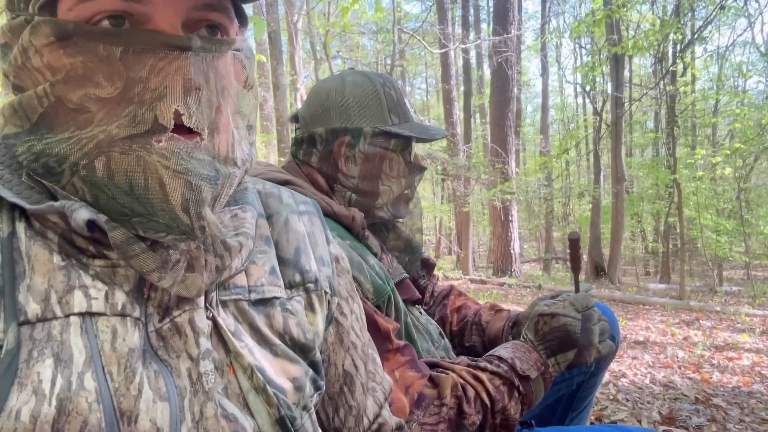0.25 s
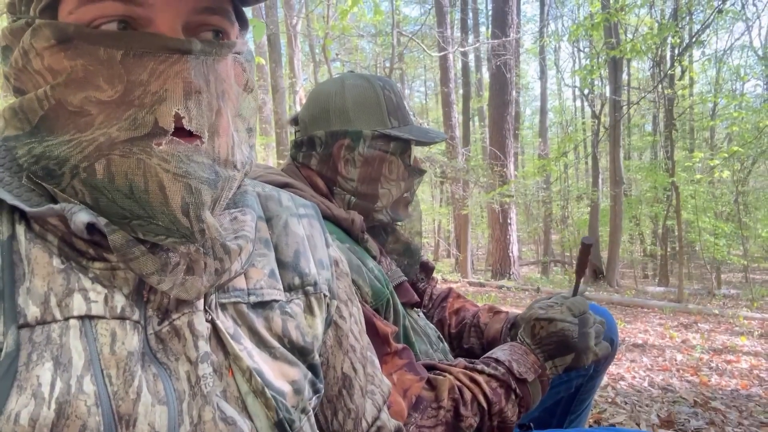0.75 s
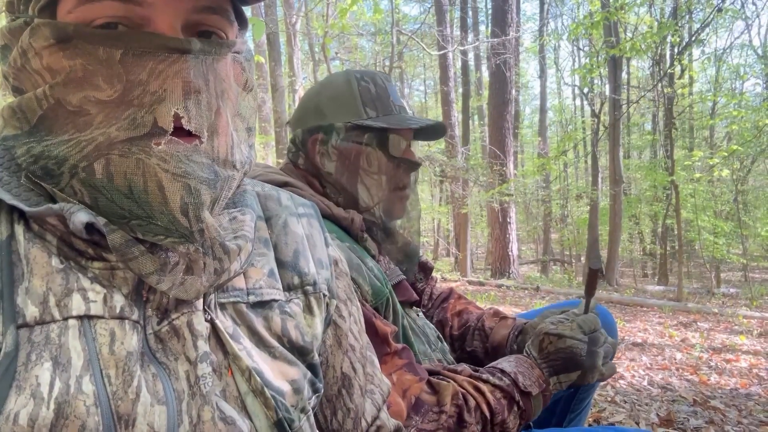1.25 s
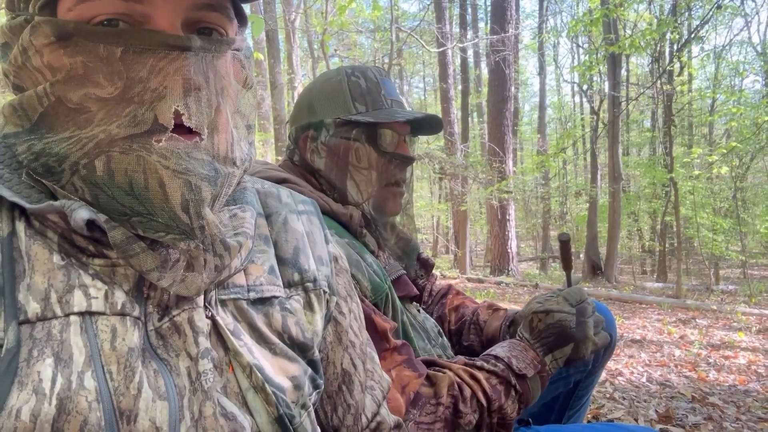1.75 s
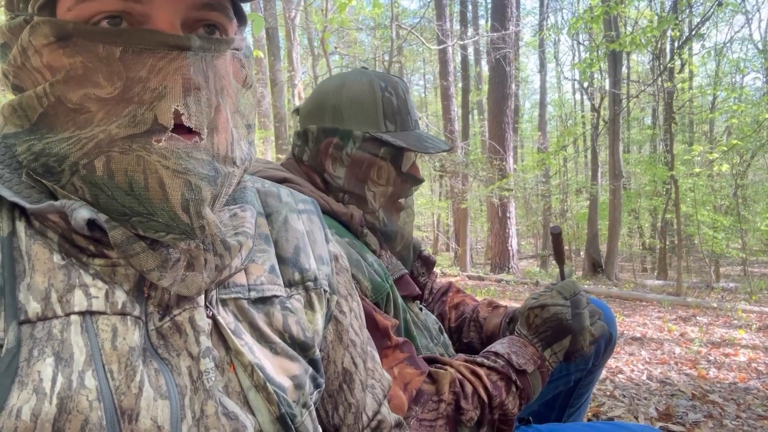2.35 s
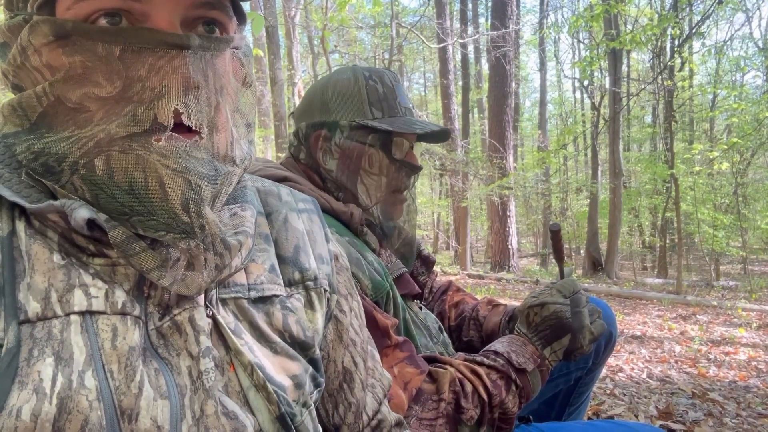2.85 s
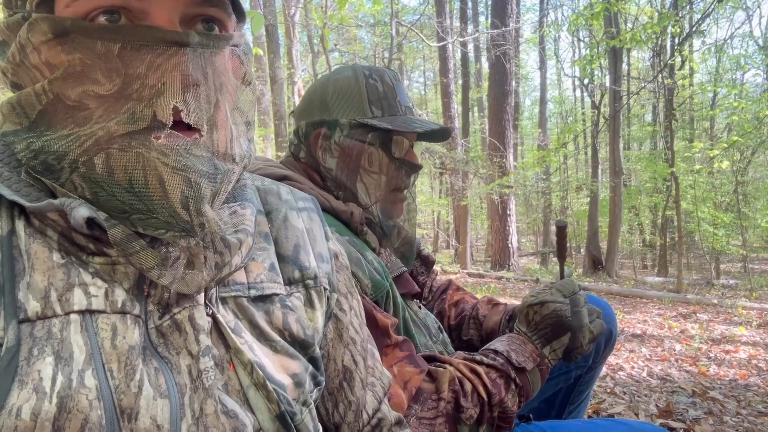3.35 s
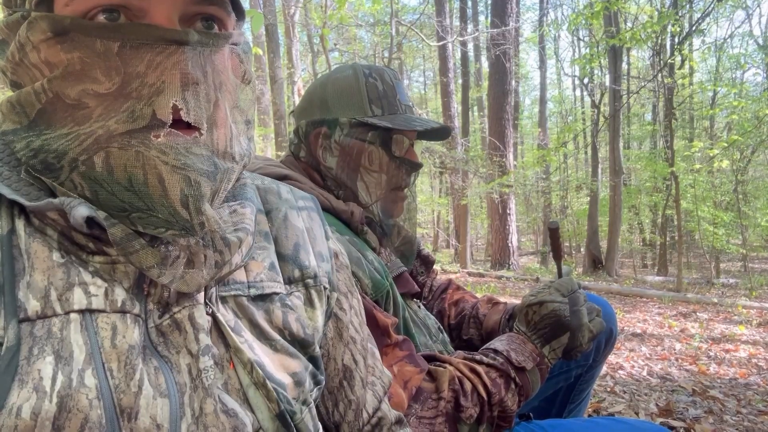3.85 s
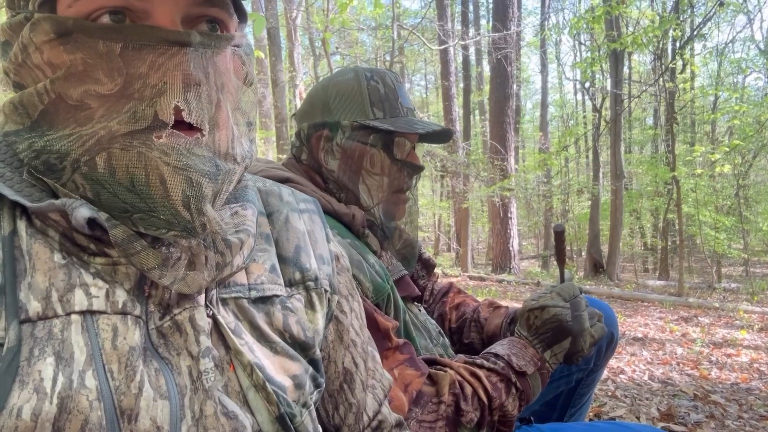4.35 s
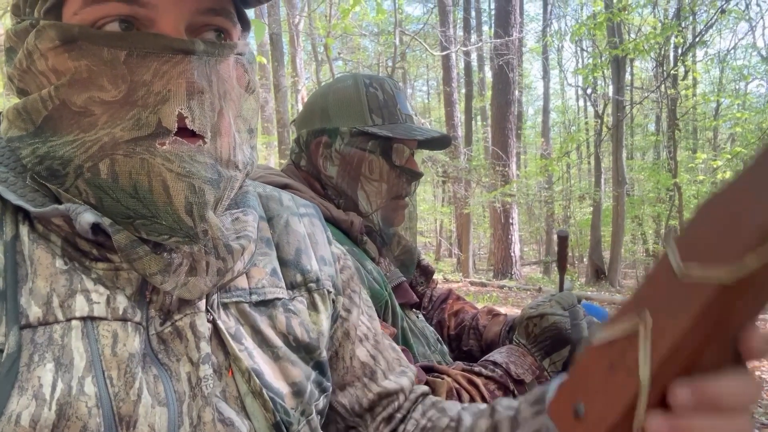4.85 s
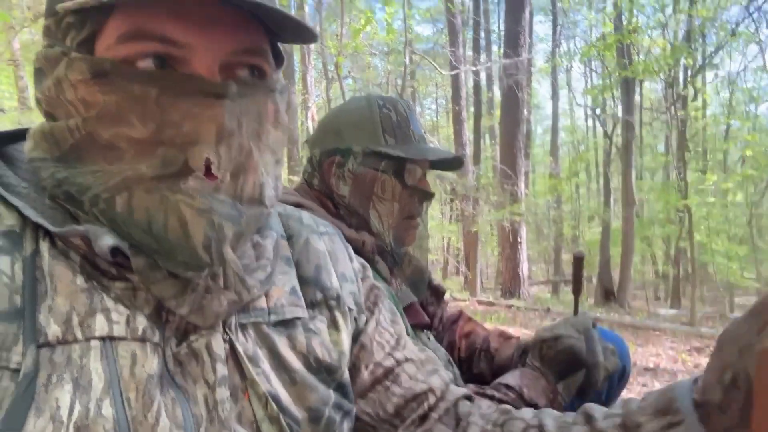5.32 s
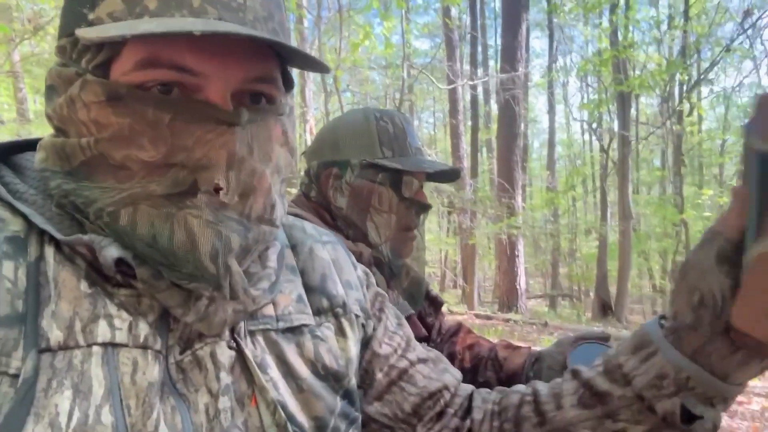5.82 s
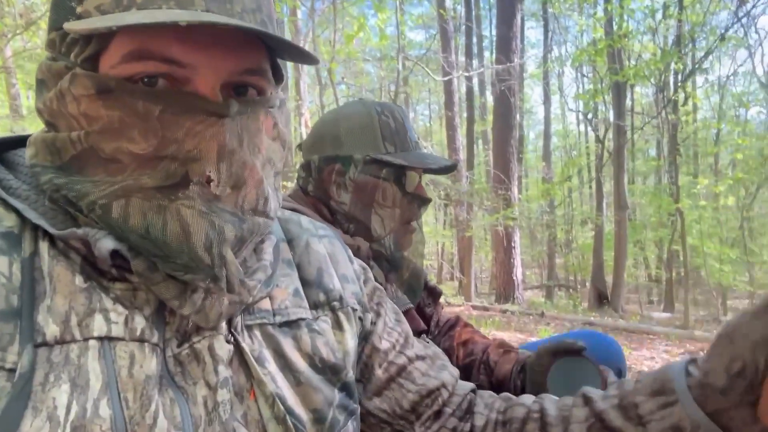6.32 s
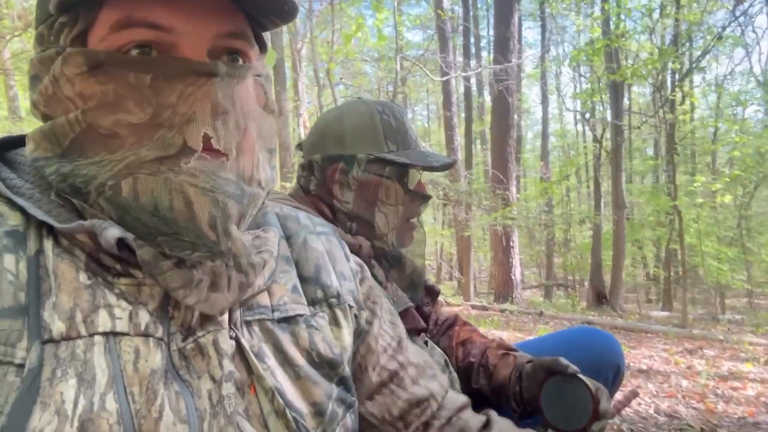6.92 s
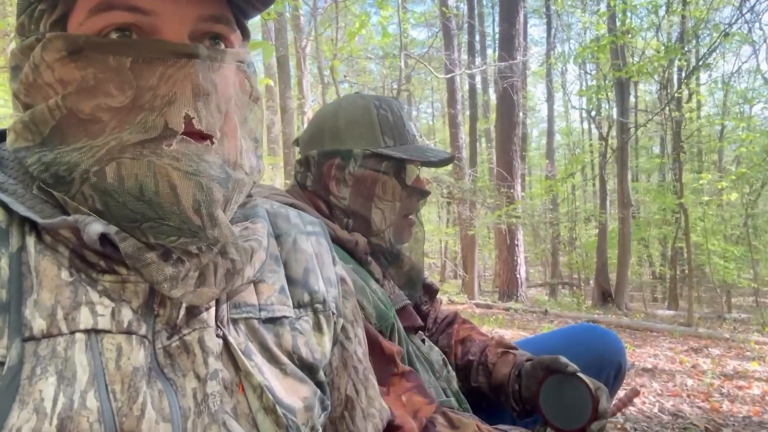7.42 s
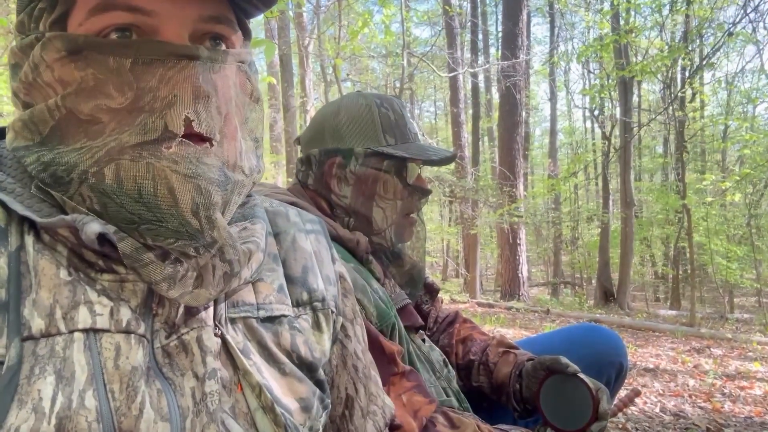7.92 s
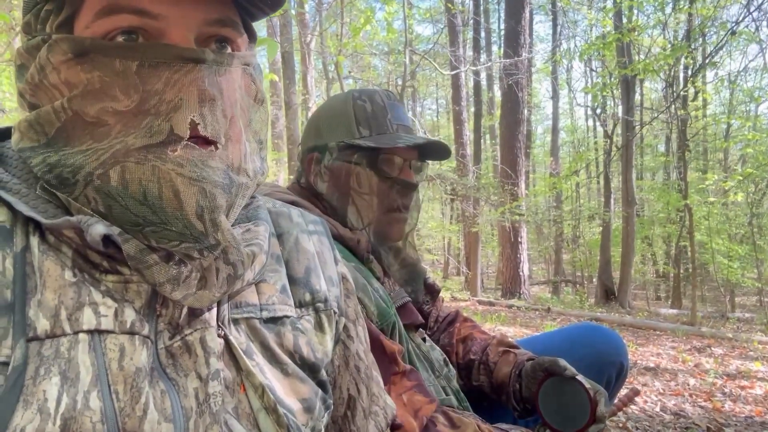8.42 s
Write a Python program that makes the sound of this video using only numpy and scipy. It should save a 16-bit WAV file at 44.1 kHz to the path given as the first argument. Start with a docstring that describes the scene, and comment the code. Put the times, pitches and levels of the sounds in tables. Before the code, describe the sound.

Quiet spring woods, heard close up with low wind rumble, very faint leaf hiss and a thin high whine coming and going until about 2.2 s. A friction pot call gives a sharp, woody cluck at 0.23 s, a much softer one at 1.33 and a barely audible one at 2.42, with small handling ticks between. From 2.57 to 4.7 come eight short yelps about 0.3 s apart, the first smoother, the others raspy then breaking into a clean rising note. Clothing thuds bump around 4.6-4.8. From 4.74 a box call is shaken: loud falling squeals, knocks and rasping wooden drags about nine times a second, with a slight tree echo, weakening after 5.95 into two low scraping slides by 6.4. A clear tap at 6.48, then scattered soft taps, strongest near 7.8, and faint wavering bird whistles at 7.2-7.7, with tiny chirps later, over wind until 8.7.

```python
"""Three clucks, each softer, and a run of mostly raspy yelps, then a squealing gobble in quiet spring woods.
A striker sticks and slips on a pot call; a box call is then shaken, its lid rubbing to and fro on the rim.
Friction pulses and noise excite each call's body; two microphone ports hear it with an echo from the woods.
Handling ticks, clothing bumps, far birds, a thin whine, leaf hiss and low wind lie underneath."""
import sys
import numpy as np
from scipy import signal
from scipy.fft import rfft, irfft, next_fast_len
from scipy.io import wavfile
from scipy.ndimage import uniform_filter1d, minimum_filter1d, map_coordinates

SR = 44100
rng = np.random.default_rng(int(sys.argv[2]) if len(sys.argv) > 2 else 0)


def wav_record(signal):
    """Record a signal, one row per channel, as 16-bit PCM in the file named by sys.argv[1]."""
    frames = np.transpose(np.atleast_2d(signal))
    bounded = np.clip(frames, -1, 1)
    # unit amplitude maps onto the largest positive 16-bit level
    quanta = np.round(bounded * 32767).astype(np.int16)
    wavfile.write(sys.argv[1], SR, quanta)


N = 382788
TIME = np.arange(N) / SR
NOISE = rng.standard_normal(2 * N)
TOP_HZ = 15900
# box call body response: (frequency [Hz], relative level [dB])
BOX_BODY = [(200, -17), (520, -12.5), (760, 0), (1020, -1), (1350, 5), (1750, 2.5), (2050, 1),
            (2280, -14.5), (2570, -6), (2950, -23.5), (3350, -12.5), (6600, -21.5), (7400, -28.5),
            (11700, -41.5)]


def undb(db):
    """Decibels to amplitude gain."""
    return 10 ** (np.asarray(db) / 20)


def level(x, db):
    """Scale to an rms level in dB."""
    return x * undb(db) / np.sqrt(np.mean(x ** 2))


def add(track, start_s, x):
    """Mix a sound into a track at a time."""
    i = max(int(start_s * SR), 0)
    track[i:i + len(x)] += x[:max(N - i, 0)]


def course(length_s):
    """Progress from 0 to 1 over a note."""
    return np.linspace(0, 1, int(length_s * SR))


def wander(n, rate_hz):
    """Random motion, spread near 1: straight lines between rate_hz random knots a second."""
    knots = np.arange(n) * rate_hz / SR
    return np.interp(knots, np.arange(N), NOISE[rng.integers(N):][:N])


def colour(x, points):
    """Minimum-phase (causal) filter with a (Hz, dB) response, built from its cepstrum."""
    n = 2 * next_fast_len(len(x) // 2 + 1024)
    hz, db = np.transpose(points)
    f = np.maximum(np.fft.rfftfreq(n, 1 / SR), 1)
    cepstrum = irfft(np.log(undb(np.interp(np.log(f), np.log(hz), db))))
    # fold onto positive time
    cepstrum[1:n // 2] *= 2
    cepstrum[n // 2 + 1:] = 0
    response = np.exp(rfft(cepstrum))
    return irfft(rfft(x, n) * response)[:len(x)]


def ring(x, body, db):
    """A short excitation rings out in a body; db is the rms of its energy spread over the excitation."""
    y = colour(np.pad(x, (0, SR // 50)), body)
    return y * undb(db) / np.sqrt(np.sum(y ** 2) / len(x))


def stick_slip(hz, tilt_db):
    """Friction pulses at a moving pitch: 18 harmonics that change by tilt_db an octave."""
    k = np.arange(1, 19)[:, None]
    weight = undb(tilt_db * np.log2(k)) * (k * hz < TOP_HZ)
    phase = 2 * np.pi * np.cumsum(hz) / SR
    return np.sum(weight * np.cos(k * phase), axis=0)


def scrape(n, patchy_db):
    """Chalked wood rubbing in uneven grains: noise of wandering level."""
    return rng.standard_normal(n) * undb(patchy_db * wander(n, 350))


def place(x, ports):
    """Two ports: nearby bodies shade and delay the left one differently at each pitch."""
    f = np.fft.rfftfreq(N, 1 / SR)
    hz, *columns = np.transpose(ports)
    db, lag_ms = (np.interp(np.log(f + 1), np.log(hz), c) for c in columns)
    late = np.exp(-2j * np.pi * f * lag_ms / 1000)
    return irfft(rfft(x) * np.array([late * undb(db / 2), undb(-db / 2)]), N)


def sway(pair):
    """The hand sways, so the sound reaches the left port a little earlier or later."""
    lag_s, rate_hz = .000025, 9
    at = np.arange(N) + lag_s * SR * wander(N, rate_hz)
    return np.array([map_coordinates(pair[0], [at], mode="nearest"), pair[1]])


def wind():
    """Low rumble as wind buffets the ports, partly in common, at first mostly the right one."""
    # rumble spectrum: (frequency [Hz], relative level [dB per Hz])
    rumble = [(13, -50.5), (22, -6), (29, -12), (36, -3), (60, 2.5), (89, -7), (264, -38), (296, -45),
              (342, -45), (456, -59), (500, -48.5), (650, -71.5), (1100, -120)]
    # wind strength: (time [s], level [dB])
    gust = [(0, -46), (2.2, -47.5), (3.8, -45.5), (4.3, -42), (4.5, -44.5), (4.7, -37), (5.4, -38),
            (6.3, -40.5), (7.1, -46.5), (8.68, -42.5)]
    # balance of the ports: (time [s], left minus right [dB])
    pan = [(4.7, -13.5), (6.5, -.3)]
    buffet_db, buffet_hz = 2.5, 7.1
    gust_db = np.interp(TIME, *np.transpose(gust)) + buffet_db * wander(N, buffet_hz)
    pan_db = np.interp(TIME, *np.transpose(pan))
    ports = undb(np.array([pan_db, -pan_db]) / 2)
    common, left, right = (level(colour(rng.standard_normal(N), rumble), 0) for _ in range(3))
    mixed = 0.94 * common + .4 * np.array([left, right])
    return mixed * ports / ports.mean(axis=0) * undb(gust_db)


def leaves():
    """Very faint leaf hiss: independent noise in each port, slowly settling."""
    # hiss spectrum: (frequency [Hz], relative level [dB per Hz])
    hiss = [(180, -20), (400, 1), (1100, -3), (2000, -11), (5000, -14), (11000, -17.5), (15000, -46)]
    # slow swell: (time [s], gain [dB])
    swell = [(4.5, 1), (6.8, -2.5)]
    pair = np.array([level(colour(rng.standard_normal(N), hiss), -79) for _ in range(2)])
    return pair * undb(np.interp(TIME, *np.transpose(swell)) + 0.48 * wander(N, 0.95))


def woods(x, t60_s, wet_db, near_db):
    """Quick scatter off the leaf litter, then a thin long echo from the trees, by noise convolution."""
    t = np.arange(int(1.5 * SR)) / SR
    # echo colours: (frequency [Hz], relative level [dB])
    trunks = [(200, -18.5), (700, -0.5), (1150, 9), (1500, -9), (1800, -2), (2200, -4), (3000, 5),
              (3900, -0.5), (5200, 6), (6300, 6.5), (11000, -11.5)]
    litter = [(500, -0.5), (1500, -9), (3000, 2.5), (6000, 2.5), (10000, -1.5)]
    far_gain = undb(wet_db - 60 * t / t60_s)
    near_gain = undb(near_db) * (np.exp(-t / 0.016) + 4 * np.exp(-t / 0.0032))
    ports = []
    for _ in range(2):
        far = colour(rng.standard_normal(len(t)) * far_gain, trunks)
        near = colour(rng.standard_normal(len(t)) * near_gain, litter)
        ports.append(signal.fftconvolve(x, far + near)[:N])
    return np.array(ports)


def whine():
    """A faint whine comes and goes: two flickering sine lines with a soft high noise chirr."""
    # spells: (time [s], length [s])
    spells = [(0, 0.71), (0.94, 0.34), (1.911, 0.33)]
    # sine lines: (frequency [Hz], level [dB])
    lines = [(1000, -84.5), (5000, -89)]
    # chirr spectrum: (frequency [Hz], relative level [dB per Hz])
    chirr = [(4200, -40.5), (5000, 1), (5400, -5.5), (5900, -2), (6300, -6.5), (7000, -42.5)]
    chirr_db = -89
    out = np.zeros(N)
    for s, length, in spells:
        u = course(length)
        fade = np.abs(np.sin(np.pi * u)) ** .3
        add(out, s, level(colour(rng.standard_normal(len(u)), chirr) * fade, chirr_db))
        for hz, db in lines:
            phase = 2 * np.pi * hz * length * u + 1.1 * wander(len(u), 60)
            line = np.sin(phase) * undb(4 * wander(len(u), 30))
            add(out, s, level(line * fade, db))
    return out


def birds():
    """Thin wavering whistles from deep in the trees, each with an exponential echo tail."""
    # notes: (time [s], length [s], mean pitch [Hz])
    notes = [(7.171, 0.097, 4220), (7.32, 0.062, 3800), (7.43, .08, 4030), (7.51, 0.086, 4530),
             (7.583, 0.083, 5460), (7.674, .07, 4600), (8.0, .02, 4980), (8.317, .025, 5050),
             (8.63, 0.026, 5070)]
    bird_db, echo_share, warble = -88, 1.2, .01
    out, t = np.zeros(N), np.arange(SR // 2) / SR
    for s, length, hz in notes:
        # many paths through the wood blur each note into a narrow band
        blur = wander(len(t), 160) + 1j * wander(len(t), 160)
        pitch = hz * (1 + warble * wander(len(t), 50))
        tone = np.exp(2j * np.pi * np.cumsum(pitch) / SR)
        whistle = level(np.real(blur * tone), bird_db)
        attack = np.minimum(2 * t / length, 1)
        echo = np.exp(-np.maximum(t - length, 0) / (echo_share * length))
        add(out, s, whistle * attack * echo)
    return out


def bumps():
    """Clothing against the microphone: low damped thuds that sink in pitch as they die."""
    # thuds: (time [s], relative level [dB])
    thuds = [(0.624, -34.5), (3.524, -30.5), (4.108, -35), (4.594, -28), (4.664, -25.5), (4.76, -25),
             (5.398, -30), (6.405, -36), (7.517, -46)]
    out, t = np.zeros(N), np.arange(SR // 5) / SR
    hz = 62 + 85 * np.exp(-t / 0.01)
    thud = np.sin(2 * np.pi * np.cumsum(hz) / SR) * (1 - np.exp(-t / 0.0037)) * np.exp(-t / 0.025)
    for s, db in thuds:
        add(out, s, undb(db + 5) * thud)
    return out


def ticks():
    """Soft taps as the calls are handled: coloured noise bursts that decay in milliseconds."""
    # taps: (time [s], peak level [dB])
    taps = [(0.435, -45.5), (0.463, -46.5), (0.616, -47), (1.27, -44), (1.285, -49), (1.432, -42.5),
            (1.45, -47), (6.481, -30.5), (6.755, -62), (7.037, -60), (6.886, -50), (7.152, -53.5),
            (7.267, -49), (7.395, -42), (7.563, -55.5), (7.692, -49.5), (7.802, -36), (7.961, -47.5),
            (8.097, -46.5), (8.206, -61)]
    # tap colour: (frequency [Hz], relative level [dB])
    tap_body = [(150, -14), (450, -1), (750, 1), (1080, 5.5), (1450, -9.5), (1900, -5), (2600, -20),
                (5500, -27.5), (10000, -52)]
    out, t = np.zeros(N), np.arange(1024) / SR
    for s, db in taps:
        tap = colour(rng.standard_normal(len(t)) * np.exp(-t / 0.0026), tap_body)
        add(out, s, tap * undb(db) / np.abs(tap).max())
    return out


def pot_call():
    """The striker chatters early in a yelp, breaks, then settles to a clean rising note; clucks are pops."""
    # yelps: (time [s], length [s], nominal pitch [Hz], level [dB], raspy until [share], rasp depth [0-1])
    yelps = [(2.57, 0.12, 706.5, -19, 0.35, 0.074), (2.896, 0.07, 728, -18, 0.36, 0.84),
             (3.187, 0.069, 732.7, -17, 0.48, 1), (3.487, 0.063, 736.6, -15.5, 0.26, 0.97),
             (3.779, 0.06, 740, -16.5, 0.38, 1), (4.079, 0.057, 722, -14.5, .4, 0.93),
             (4.36, 0.06, 715.6, -17, 0.39, 1), (4.625, 0.056, 717, -17, 0.45, 1)]
    # course of one yelp, breaking midway: (progress [0-1], pitch [ratio], relative level [dB])
    stroke = [(0, 1.02, -21.5), (0.11, .99, 2), (0.3, .98, -0.5), (.42, 1.02, 1.5), (0.501, .9, -11.5),
              (0.589, .99, 4), (.72, 1.04, 1.5), (.86, 1.1, -4), (.95, 1.28, -12), (1, 0.94, -42.5)]
    # clucks: (time [s], length [s], start pitch [Hz], end pitch [Hz], level [dB])
    clucks = [(0.227, 0.028, 866, 662, -14.5), (1.328, 0.0088, 782, 645, -29.5),
              (2.422, 0.011, 750, 670, -49.5)]
    # pot body response: (frequency [Hz], relative level [dB])
    pot_body = [(300, -44), (520, -29), (680, -48), (950, -24.5), (1250, 4.5), (1480, 1), (1800, -10),
                (2100, -1.5), (2600, -14.5), (3150, -44.5), (3550, -32), (3950, -22), (4700, -34.5),
                (6100, -29.5), (15000, -74.5)]
    out = np.zeros(N)
    progress, ratio, stroke_db = np.transpose(stroke)
    for s, length, hz, db, until, depth in yelps:
        u = np.interp(course(length), [0, until, 1], [0, .5, 1])
        rasp = depth * np.interp(u, [.12, .24, .5, .58], [0, 1, 1, 0])
        # a gentle stroke hardly breaks
        mend = (1 - depth) * np.interp(u, [.25, .42, .5, .59], [0, 1, 1, 0])
        jitter = (.012 + .085 * rasp) * wander(len(u), 1100)
        pitch = hz * (np.interp(u, progress, ratio) * (1 - mend) + .96 * mend) * (1 + jitter)
        force_db = np.interp(u, progress, stroke_db) * (1 - mend)
        # in the rasp every third slip is stronger and the grip flutters
        third = np.cos(2 * np.pi * np.cumsum(pitch) / SR / 3)
        flutter = np.tanh(2 * wander(len(u), 350))
        chatter = (1 + .7 * rasp * third) * (1 + .45 * rasp * flutter)
        grit = (.38 + .4 * rasp) * rng.standard_normal(len(u))
        slips = stick_slip(pitch, tilt_db=-2.5) * chatter + grit
        add(out, s, ring(slips * undb(force_db), pot_body, db))
    for s, length, start_hz, end_hz, db in clucks:
        u = course(length)
        pitch = (start_hz + (end_hz - start_hz) * u) * (1 + .015 * wander(len(u), 1200))
        slips = stick_slip(pitch, tilt_db=-3.0) + 0.95 * rng.standard_normal(len(u))
        add(out, s, ring(slips * np.sin(np.pi * u) ** 2, pot_body, db))
    return out


def push(length_s, db):
    """The lid swings out: a falling squeal, higher when pushed hard, over a light scrape."""
    base_hz, hard_db, hz_per_db, fall_share, scrape_db = 1284, -13, 12, 0.21, -28
    u = course(length_s)
    arc = np.abs(np.sin(np.pi * u))
    hz = base_hz + hz_per_db * max(db - hard_db, 0)
    pitch = hz * (1 - fall_share * (u - .5)) * (1 + 0.035 * wander(len(u), 450))
    grip = arc ** 1.7 * undb(2.8 * wander(len(u), 250))
    slips = stick_slip(pitch, tilt_db=-18.5) + 0.25 * scrape(len(u), patchy_db=6.5)
    squeal = ring(slips * grip, BOX_BODY, db)
    return squeal + ring(scrape(len(u), patchy_db=5) * arc ** 1.6, BOX_BODY, scrape_db)


def drag(hz, db):
    """The lid drags back: a low tone plus rasping skips; db is relative."""
    length_s, tone_db, scrape_db = 0.052, -6.5, -1
    u = course(length_s)
    swell = np.abs(np.sin(np.pi * u)) ** 0.85
    bend = .06 * rng.standard_normal() * (u - .5) + .015 * rng.standard_normal()
    pitch = hz * (1 + .1 * (u - .5) ** 2 + bend) * (1 + 0.059 * wander(len(u), 800))
    tone = ring(stick_slip(pitch, tilt_db=-17.5) * swell, BOX_BODY, db + tone_db)
    # the lid skips in quick bursts, which break up the upper partials
    bounce_hz = 120 * (1 + .3 * wander(len(u), 200))
    bounce = 1 + 0.54 * np.cos(2 * np.pi * np.cumsum(bounce_hz) / SR)
    skips = stick_slip(hz * (1 + 0.13 * wander(len(u), 700)), tilt_db=-0.5)
    rasp = (skips + 2.2 * scrape(len(u), patchy_db=6.0)) * bounce * swell
    return tone + ring(rasp, BOX_BODY, db + scrape_db)


def knock(db, squeak_db):
    """The lid catches on the rim: a bright noise crack and a brief squeak, squeak_db relative to db."""
    crack_db, decay_s, squeak_hz, squeak_s = 6, 0.0026, 1354, 0.0085
    t = course(.03) * .03
    # differencing brightens the noise
    burst = np.diff(rng.standard_normal(len(t) + 1)) * (1 - np.exp(-t / 0.0014)) * np.exp(-t / decay_s)
    crack = colour(burst, BOX_BODY)
    grip = np.sin(np.pi * np.minimum(t / squeak_s, 1)) ** 2
    pitch = squeak_hz * (1 + .09 * wander(len(t), 600))
    squeak = colour(stick_slip(pitch, tilt_db=-9) * grip, BOX_BODY)
    crack *= undb(db + crack_db) / np.abs(crack).max()
    return crack + squeak * undb(db + squeak_db) / np.abs(squeak).max()


def slow_slides(out):
    """The last two slow slides of the lid: stick-slip at a gliding pitch plus scrape."""
    # slide course: (time [s], pitch [Hz], level [dB])
    slide = [(6.272, 790, -44), (6.283, 780, -25), (6.302, 770, -27), (6.328, 733.7, -48.5),
             (6.347, 661, -26.5), (6.362, 601.4, -24.5), (6.389, 640.4, -26.5), (6.408, 740, -47)]
    s, hz, db = np.transpose(slide)
    t = s[0] + course(s[-1] - s[0]) * (s[-1] - s[0])
    pitch = np.interp(t, s, hz) * (1 + 0.0088 * wander(len(t), 902))
    slips = stick_slip(pitch, tilt_db=-1.5) + 1.5 * scrape(len(t), patchy_db=8.5)
    add(out, s[0], level(colour(slips, BOX_BODY), 0) * undb(np.interp(t, s, db)))


def rubbing():
    """The lid never leaves the rim while shaken: a continuous scrape through the box body."""
    # rubbing strength: (time [s], level [dB])
    strength = [(4.72, -68.5), (4.74, -42.5), (4.77, -31.5), (4.788, -43.5), (4.87, -42), (5.1, -39.5),
                (5.9, -41.5), (6.379, -50), (6.43, -87)]
    s, db = np.transpose(strength)
    active = (TIME > s[0]) * (TIME < s[-1])
    return level(colour(scrape(N, patchy_db=-0.5), BOX_BODY), 0) * undb(np.interp(TIME, s, db)) * active


def box_call():
    """About nine shakes a second, each a squealing push, a knock, a rasping drag and a second knock."""
    # shakes: (push middle [s], push length [s], squeal level [dB], lid turn [s],
    #          turn knock relative level [dB], drag relative level [dB], stop knock relative level [dB])
    shakes = [(4.804, .02, -9.5, 4.824, -25.5, -34.5, -42.5),
              (4.908, .012, -10.5, 4.921, -30.5, -38, -42.5), (4.943, 0.011, -8, 4.955, -12, -22, -17.5),
              (5.054, .023, -9.5, 5.071, -17, -21, -24.5), (5.168, .028, -14.5, 5.184, -18.5, -21.5, -25),
              (5.288, .026, -14, 5.302, -21.5, -21.5, -23.5),
              (5.404, .021, -11.5, 5.421, -21, -22.5, -19.5),
              (5.517, .025, -15.5, 5.535, -26.5, -20, -13.5), (5.63, .024, -12, 5.648, -20.5, -20, -18),
              (5.741, .02, -14, 5.759, -19, -21, -19), (5.85, .02, -15, 5.863, -23, -22, -20),
              (5.953, .022, -25, 5.968, -26.5, -22.5, -23), (6.079, .016, -36, 6.073, -30, -21.5, -22),
              (6.171, .022, -34.5, 6.182, -27, -25, -22.5)]
    drag_delay_s, drag_hz, sag_hz_per_s = .021, 772.6, 24
    return_s, quicken_s_per_s = .055, .005
    turn_squeak_db, stop_squeak_db = 9.5, -1
    rebound_s, rebound_db, rebound_squeak_db = .013, -12.5, 13.5
    out = np.zeros(N)
    # the lid is drawn back once before the first shake
    add(out, 4.735, drag(814, -28.5))
    for middle, length, squeal_db, turn, turn_db, drag_db, stop_db in shakes:
        # swings quicken and drags flatten as the shaking goes on
        elapsed = turn - shakes[0][3]
        elapsed += shakes[0][3] - shakes[0][0]  # counted from the first push
        add(out, middle - length / 2, push(length, squeal_db))
        add(out, turn + drag_delay_s, drag(drag_hz - sag_hz_per_s * elapsed, drag_db))
        stop = turn + return_s - quicken_s_per_s * elapsed
        for at, db, squeak_db in (turn, turn_db, turn_squeak_db), (stop, stop_db, stop_squeak_db):
            add(out, at, knock(db, squeak_db))
            add(out, at + rebound_s, knock(db + rebound_db, rebound_squeak_db))
    slow_slides(out)
    out += rubbing()
    return signal.sosfilt(signal.butter(8, 11300, fs=SR, output="sos"), out)


def scene():
    """Both calls reach the right port first; woods and small sounds join them."""
    # port differences: (frequency [Hz], left minus right [dB], left delay [ms])
    pot_side = [(850, 0, .12), (1150, -2, .39), (1300, -5, .26), (1500, -3, .2), (2050, 3, .14),
                (2600, 0, .27), (4000, 0, .24), (6000, 1, .21)]
    box_side = [(750, 0, .19), (1080, 1, .28), (1260, -2, .39), (1450, -8, .27), (1900, 2, .32),
                (2300, 0, .39), (5000, 0, .33)]
    cloth_side = [(60, -12.5, 0.014), (197.7, -18, 0.0063)]
    tick_side = [(500, 0, .08), (3000, 0, .08)]
    pot, box = pot_call(), box_call()
    near = place(pot, pot_side) + sway(place(box, box_side))
    small = place(ticks(), tick_side) + place(bumps(), cloth_side) + birds() + whine()
    echo = woods(pot + box, t60_s=0.94, wet_db=-67, near_db=-40.5)
    return near + small + echo + wind() + leaves()


def record(dry):
    """Thin the deepest rumble, turn down the highest peaks in both ports alike and cut the top."""
    x = signal.sosfilt(signal.butter(3, 33, "high", fs=SR, output="sos"), dry)
    peak_gain = .92 / np.maximum(np.abs(x).max(axis=0), .92)
    gain = uniform_filter1d(minimum_filter1d(peak_gain, size=301), size=301)
    return signal.sosfilt(signal.ellip(8, .2, 70, TOP_HZ, fs=SR, output="sos"), x * gain)


dry = scene()
out = record(dry)
wav_record(out)
```